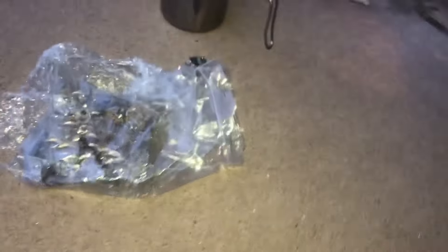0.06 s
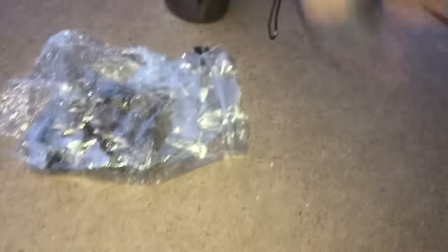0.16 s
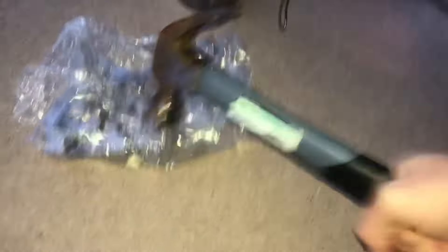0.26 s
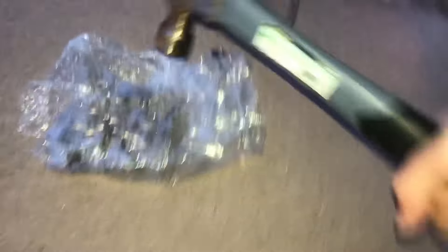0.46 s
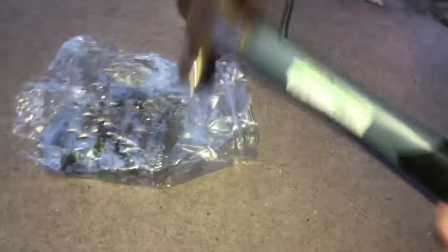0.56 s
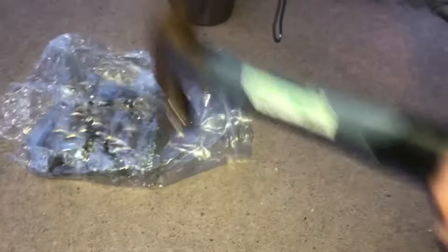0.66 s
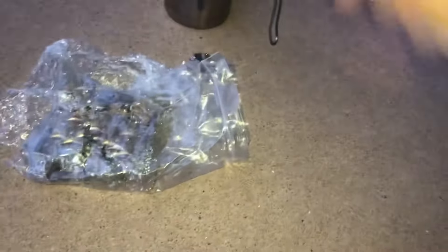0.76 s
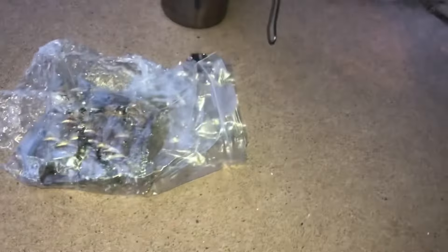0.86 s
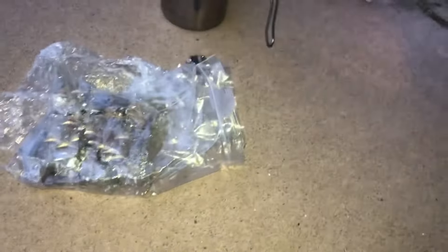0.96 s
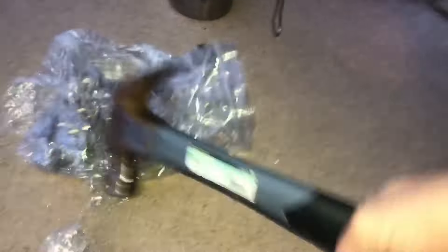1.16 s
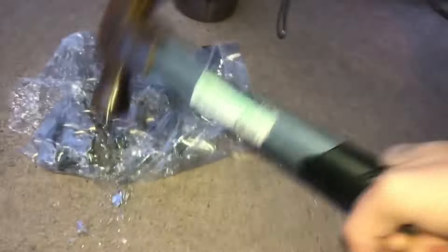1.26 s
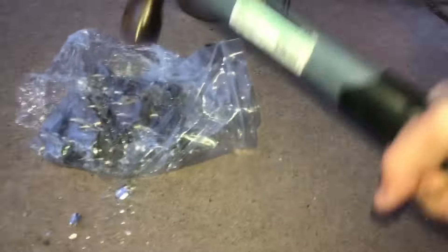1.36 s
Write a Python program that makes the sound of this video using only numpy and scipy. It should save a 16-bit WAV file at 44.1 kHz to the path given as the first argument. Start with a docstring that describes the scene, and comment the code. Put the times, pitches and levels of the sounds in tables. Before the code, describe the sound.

A steel hammer hits metal chunks in a plastic bag on concrete, a bright clinking crack, faint bag ticks, then a second, crunchier blow spraying crumbs; close microphone in a small hard room with low rumble.

```python
"""Over a low rumble of shaped noise in a small hard room, noise swells as a sleeve swishes and a bag ticks.
A steel hammer strikes metal chunks in the plastic bag on concrete: the first blow, a noise crack over
damped modes, clinks off a chunk and loose pieces ring on. Noise snaps tick and the sleeve swishes again.
The second blow crushes a chunk: random grains of noise scatter as crumbs, and last bits land.
A puff and a thin tone swell into each blow; decaying noise and low modes make the room boom after it."""
import sys
import numpy as np
from scipy import signal
from scipy.fft import rfft, irfft, next_fast_len
from scipy.io import wavfile

SR = 44100
rng = np.random.default_rng(int(sys.argv[2]) if len(sys.argv) > 2 else 0)


def inscribe(sig):
    """Save sig as 16-bit PCM at rate SR to the path in sys.argv[1].

    A 1-D sig is mono; a 2-D sig holds one channel per row.
    Samples are clipped to [-1, 1] before scaling.
    """
    pcm = np.round(np.clip(np.atleast_2d(sig).T, -1, 1) * 32767)
    wavfile.write(sys.argv[1], SR, pcm.astype(np.int16))


N = 61739

# hammer blows: (time [s], crack level [dB], knock gain [dB], lead tick gain [dB under the blow], boom level [dB])
HAMMER_BLOWS = [(0.24, -10, -17, -26.5, -23), (1.096, -12, -15.5, -27.5, -24)]


def amp(db):
    """Amplitude factor of a level in dB."""
    return 10 ** (np.asarray(db) / 20)


def unit(x):
    """x scaled to rms 1."""
    return x / np.sqrt(np.mean(x ** 2) + 1e-20)


def along(points, hz):
    """Values read from (frequency [Hz], value) points on a log frequency axis."""
    f, v = np.transpose(points)
    return np.interp(np.log(hz + 1), np.log(f + 1), v)


def clock():
    """Time of each sample in seconds."""
    return np.arange(N) / SR


def fade(t, t60):
    """Gain of a decay that loses 60 dB in t60 seconds."""
    return 10 ** (-3 * t / np.maximum(t60, 1e-4))


def at(s, x):
    """x delayed to start at s seconds."""
    return np.pad(x, (max(round(s * SR), 0), 0))[:N]


def filtered(x, response):
    """x with its spectrum multiplied by a response of frequency."""
    m = next_fast_len(N + SR // 2)  # spare length keeps the end from wrapping onto the start
    hz = np.fft.rfftfreq(m, 1 / SR)
    return irfft(rfft(x, m) * response(hz), m)[:N]


def noise(spectrum):
    """Noise of rms 1, coloured by (frequency [Hz], level [dB]) points."""
    return unit(filtered(rng.standard_normal(N), lambda hz: amp(along(spectrum, hz))))


def ring(modes, attack):
    """Damped modes set off together by one contact, with alternating signs; attack is a time constant [s]."""
    t = clock()
    waves = np.zeros(N)
    for k, (hz, db, t60) in enumerate(modes):
        waves += (-1) ** k * amp(db) * fade(t, t60) * np.sin(2 * np.pi * hz * t)
    return waves * (1 - np.exp(-t / attack))


def room_tail(source):
    """Steady noise shaped as the room's answer: a weak start, the walls' first return, a decay by frequency."""
    # decay of the room: (frequency [Hz], t60 [s])
    room_decay = [(60, 0.22), (500, 0.48), (1000, 0.4), (1900, 0.37), (3500, 0.36), (6000, 0.32),
                  (14000, 0.49)]
    wall_delay_s, wall_rise_s = 0.016, 0.0013
    near_share = 0.21  # gain before the walls answer
    early_db, early_t60_s = -4, 0.25  # an added share that dies away on top of the room's decay

    hz, s, z = signal.stft(source, SR, nperseg=256)
    decay = fade(s, along(room_decay, hz)[:, None])
    tail = signal.istft(z * decay, SR, nperseg=256)[1][:N]
    t = clock()
    wall_return = (1 + np.tanh((t - wall_delay_s) / wall_rise_s)) / 2
    arrival = near_share + (1 - near_share) * wall_return
    return tail * arrival * (1 + amp(early_db) * fade(t, early_t60_s))


def rumble():
    """The room rumbles low and steadily: noise with most of its weight in the bass."""
    # colour of the rumble: (frequency [Hz], level [dB])
    rumble_colour = [(20, -40), (32, -25.5), (50, -11.5), (87, 0), (157, -5), (190, -3), (270, -2.5),
                     (363, -8), (405, -4), (503, -13.5), (591, -10), (754, -15.5), (1400, -33),
                     (4250, -45.5), (10000, -50.5), (16000, -54.5)]
    return amp(-50.5) * noise(rumble_colour)


def sleeve():
    """Cloth swishes softly as the arm comes down: noise that swells and sinks as half a sine."""
    # downswings: (time [s], length [s], peak level [dB])
    swings = [(0.089, 0.1, -74), (0.823, 0.24, -67)]
    # colour of the cloth: (frequency [Hz], level [dB])
    cloth_colour = [(800, -7), (1800, 3), (2400, -13), (3300, 2.5), (5000, -7), (9000, -18.5), (16000, -47)]
    out = np.zeros(N)
    for s, length, db in swings:
        progress = np.clip((clock() - s) / length, 0, 1)
        out += amp(db) * noise(cloth_colour) * np.sin(np.pi * progress)
    return out


def ticks():
    """Creases of the bag snap and loose bits land: each is a short decay of noise around one pitch."""
    # single ticks: (time [s], level [dB], centre [Hz], t60 [s])
    snaps = [(.028, -61, 4000, .01), (0.052, -67, 2012, .01), (.4690, -57, 7000, .006),
             (.523, -62, 7000, .008), (.541, -63, 6950, .01), (0.5976, -55.5, 5800, 0.00415),
             (.6190, -61.5, 5960, .01), (1.278, -42, 780, 0.027), (1.297, -48.5, 890, 0.023),
             (1.3345, -42, 710, 0.045), (1.3346, -47.5, 1830, 0.016), (1.3680, -49, 4900, .008),
             (1.381, -46.5, 3580, 0.0067), (1.395, -49, 5200, 0.0053)]
    half_gain_oct = 0.6  # distance from the centre where the gain has halved
    out = np.zeros(N)
    for s, db, centre, t60 in snaps:
        def peak(hz):
            octaves = np.log2((hz + 1) / centre)
            return 1 / (1 + (octaves / half_gain_oct) ** 2)
        snap = unit(filtered(rng.standard_normal(N), peak))
        out += amp(db) * at(s, snap * fade(clock(), t60))
    return out


def lead_in():
    """A low puff and a thin tone swell into each blow, then stop at it."""
    # colour of the puff: (frequency [Hz], level [dB])
    puff_colour = [(100, -18.5), (300, -7), (550, -1), (1000, -16.5), (2300, -28.5), (5000, -40.5),
                   (16000, -52)]
    puff_db, puff_60db_s = -23, 0.013  # level at the blow, time to grow by 60 dB
    tone_hz, tone_db, tone_60db_s = 3100, -23.5, 0.0282
    t, out = clock(), np.zeros(N)
    for s, *_ in HAMMER_BLOWS:
        left = np.abs(s - t)
        puff = amp(puff_db) * noise(puff_colour) * fade(left, puff_60db_s)
        tone = amp(tone_db) * np.sin(2 * np.pi * tone_hz * left) * fade(left, tone_60db_s)
        out += (puff + tone) * (t < s)
    return out


def pings():
    """Loose pieces jolted by the first blow ring on briefly, one damped mode each."""
    # ringing pieces: (time [s], frequency [Hz], level [dB], t60 [s])
    pieces = [(.2545, 6195, -25, .085), (.256, 5685, -33, .23), (.256, 5580, -34, .19),
              (.256, 1583, -29, .17)]
    attack_s = 0.0017
    return sum(at(s, ring([mode], attack_s)) for s, *mode in pieces)


def crumbs():
    """Crumbs scatter over the bag and floor: tiny random contacts gate noise in sprays that die away."""
    # sprays: (time [s], level [dB], t60 [s], contact rate [1/s])
    sprays = [(1.097, -19.5, 0.12, 3200), (1.113, -19.5, 0.084, 5000), (1.122, -47.5, 1, 1700),
              (.40, -59.5, 0.48, 450)]
    # colour of the crumbs: (frequency [Hz], level [dB])
    crumb_colour = [(200, -25), (500, -30), (1500, -0.5), (3000, -1), (6500, 3.5), (10500, -2),
                    (13000, -10), (16000, -20)]
    spread_db = 5.2  # scale of the random boost of each contact
    grain_t60_s, spray_rise_s = 0.0055, 0.0023
    t, out = clock(), np.zeros(N)
    for s, db, t60, rate in sprays:
        hits = rng.random(N) < rate / SR
        contacts = hits * amp(spread_db * np.minimum(rng.exponential(size=N), 4))
        # overlapping grains add in power
        power = np.abs(signal.fftconvolve(contacts ** 2, fade(t, grain_t60_s) ** 2)[:N])
        grains = unit(np.sqrt(power) * noise(crumb_colour))
        envelope = fade(t, t60) * (1 - np.exp(-t / spray_rise_s))
        out += amp(db) * at(s, grains * envelope)
    return out


def boom():
    """The room booms after each blow as decaying noise, and its low standing waves build up and ring."""
    # colour of the room's answer: (frequency [Hz], level [dB])
    boom_colour = [(25, -34.5), (45, -7), (75, -7), (120, -5), (195, -7.5), (290, -1.5), (500, -2.5),
                   (720, -5), (930, -10), (1250, -11.5), (1650, -6), (2200, -10), (2950, -15.5),
                   (4300, -13), (4950, -18), (5600, -13.5), (6700, -20), (10000, -30), (16000, -47)]
    # standing waves: (frequency [Hz], level [dB], t60 [s])
    standing_waves = [(70, -23, .13), (139, -35, .2), (170, -40, .35), (243, -28, .24), (303, -31, .25),
                      (378, -31, .3), (463, -39, .35), (548, -39, .35), (684, -37, .3)]
    standing_delay_s, standing_rise_s = 0.006, 0.0097
    out = np.zeros(N)
    for s, *_, db in HAMMER_BLOWS:
        out += amp(db) * at(s, room_tail(noise(boom_colour)))
        out += at(s + standing_delay_s, ring(standing_waves, standing_rise_s))
    return out


def hammer():
    """Each blow cracks as noise, rings its chunk and knocks the floor; faint ticks come just ahead of it."""
    # colour of the crack: (frequency [Hz], level [dB])
    crack_colour = [(200, -8.5), (800, 0.5), (1300, -15.5), (2700, -5), (4500, -3.5), (7000, -7.5),
                    (10000, -15.5), (16000, -28.5)]
    # ring of the chunk, one list of modes per blow: (frequency [Hz], level [dB], t60 [s])
    chunk_modes = [
        [(2595, -17, .018), (3480, -18, .012), (4262, -12, .015), (4777, -20, .014), (5597, -7, .016),
         (6195, -30, .07), (7320, -14, .011), (8236, -23, .007)],
        [(2690, -15, .019), (3130, -20, .016), (4216, -13, .012), (4436, -20, .01), (5602, -25, .025),
         (6262, -25, .018), (6742, -25, .018)],
    ]
    # dull knock of hammer head and floor: (frequency [Hz], level before the blow's gain [dB], t60 [s])
    knock_modes = [(160, -15.5, 0.037), (317, -7.5, .03), (703.4, 2, 0.031), (856, 0.5, 0.011),
                   (1690, -14.5, 0.049), (2043, -17.5, .03)]
    # ticks ahead of each blow: (time ahead [s], level before the blow's tick gain [dB])
    early_ticks = [(.0232, 0), (.0115, -4)]
    crack_t60_s, ring_attack_s, knock_attack_s = 0.014, 0.00005, 0.0006
    tick_t60_s = 0.036  # damps the ticks further, on top of the crack's and chunk's own decay
    t, out = clock(), np.zeros(N)
    for (s, crack_db, knock_db, lead_db, _), modes in zip(HAMMER_BLOWS, chunk_modes):
        crack = amp(crack_db) * noise(crack_colour) * fade(t, crack_t60_s)
        sharp = crack + ring(modes, ring_attack_s)
        knock = amp(knock_db) * ring(knock_modes, knock_attack_s)
        out += at(s, sharp + knock)
        for ahead, db in early_ticks:
            out += amp(lead_db + db) * at(s - ahead, sharp * fade(t, tick_t60_s))
    return out


def scene():
    """Blows, crumbs and ticks in the room, over the sleeve and the rumble; the small bits get an echo."""
    wet_db = -12.5
    bits = crumbs() + ticks()
    echo = room_tail(rng.standard_normal(N))
    wet = signal.fftconvolve(bits, echo / np.linalg.norm(echo))[:N]
    blows = lead_in() + hammer() + pings() + boom()
    return (blows + bits + amp(wet_db) * wet + sleeve() + rumble())[None]


def record(dry):
    """The recorder rounds off the highest peaks and drops the deep bass and all above its band limit."""
    ceiling, low_cut_hz, top_hz = 0.95, 36, 15800
    rounded = dry[0] / (1 + np.abs(dry[0] / ceiling) ** 6) ** (1 / 6)
    low_cut = signal.butter(4, low_cut_hz, "high", fs=SR, output="sos")
    thin = signal.sosfilt(low_cut, rounded)
    return filtered(thin, lambda hz: 1 / (1 + (hz / top_hz) ** 200))[None]


dry = scene()
out = record(dry)
inscribe(out)
```